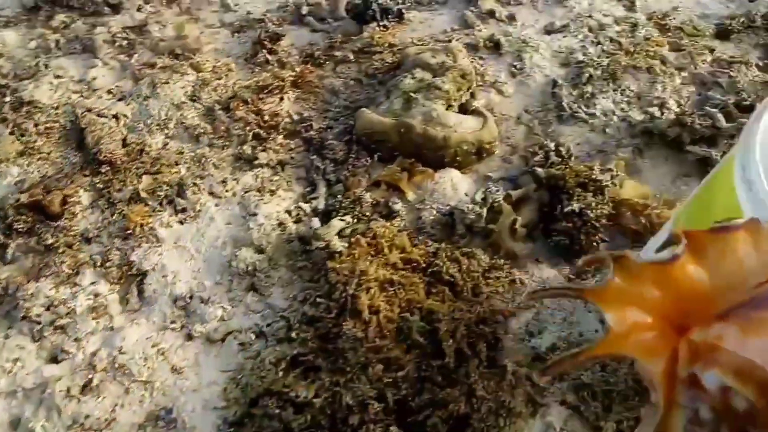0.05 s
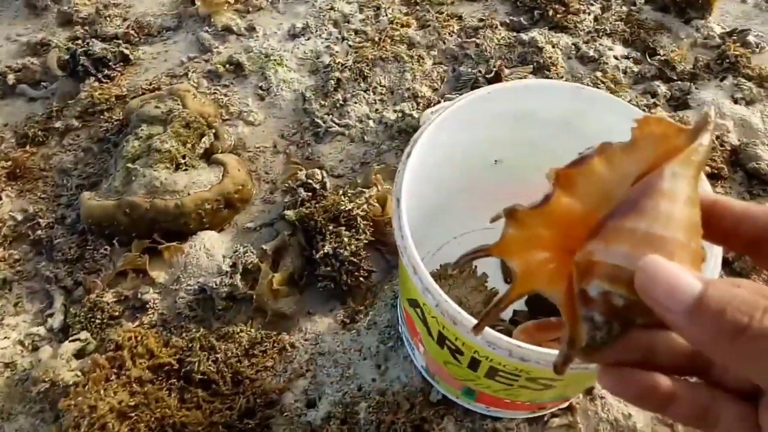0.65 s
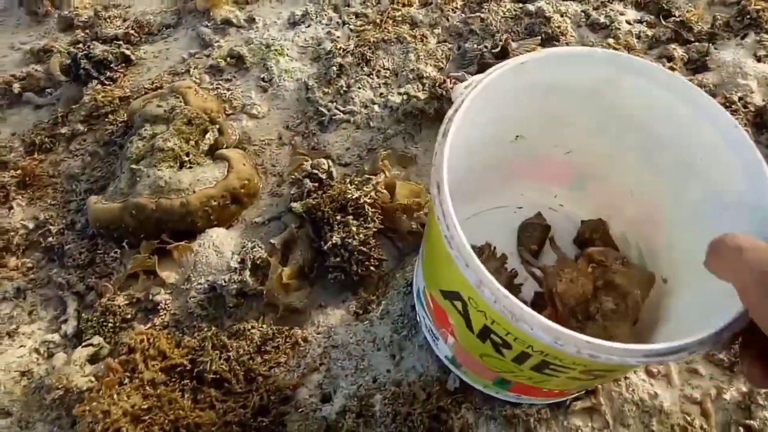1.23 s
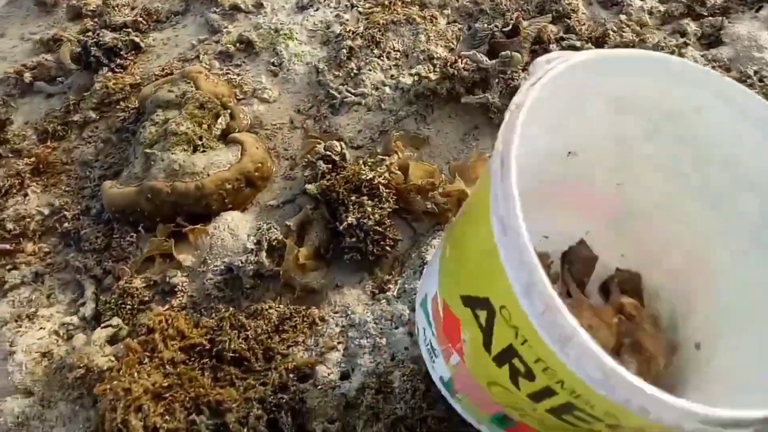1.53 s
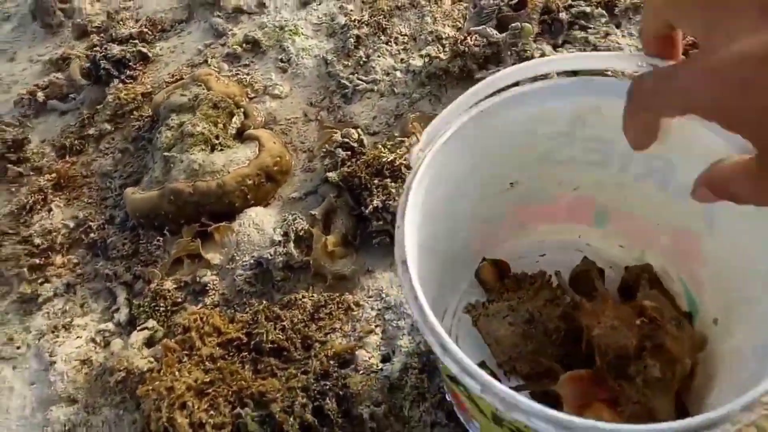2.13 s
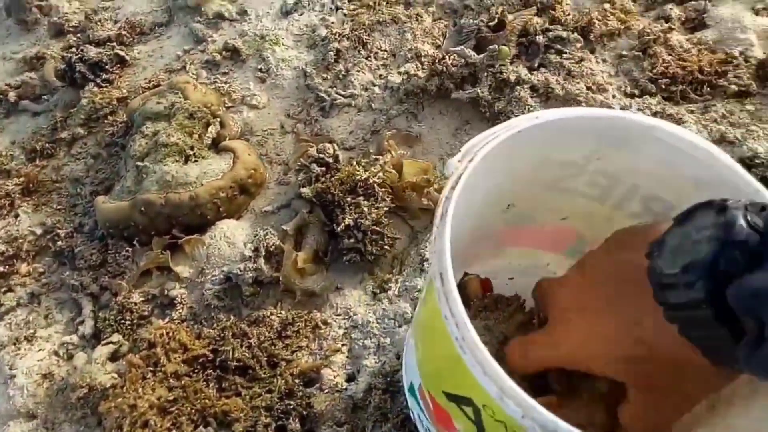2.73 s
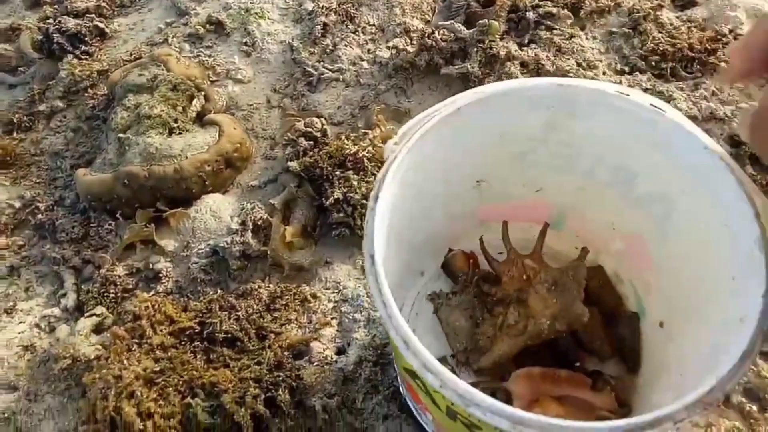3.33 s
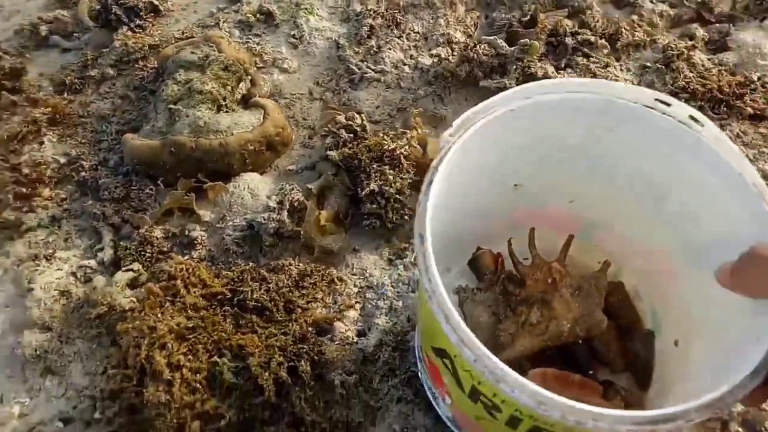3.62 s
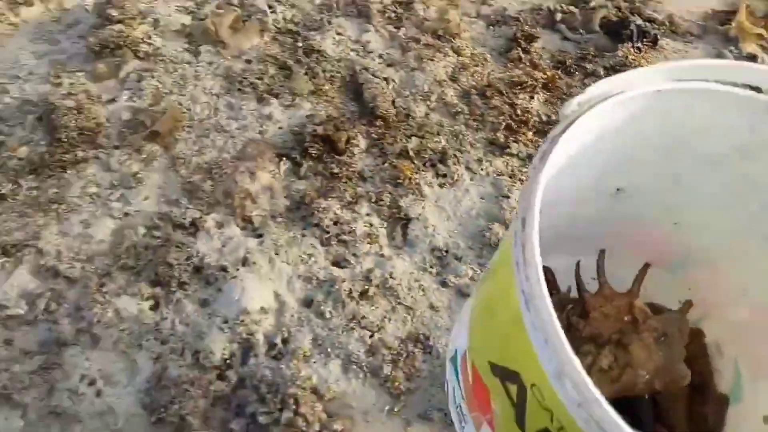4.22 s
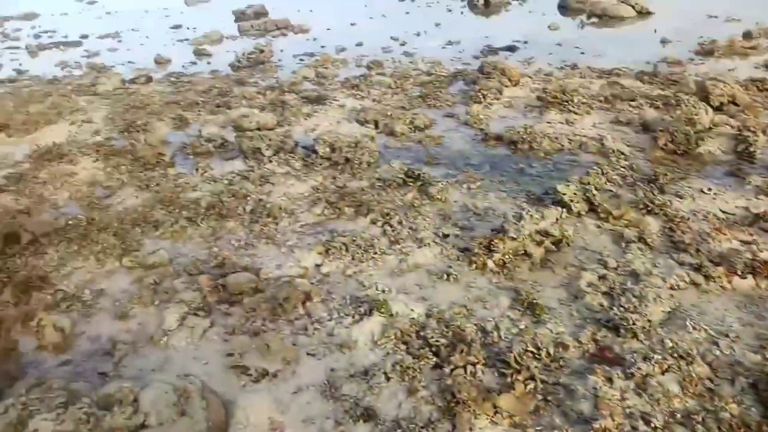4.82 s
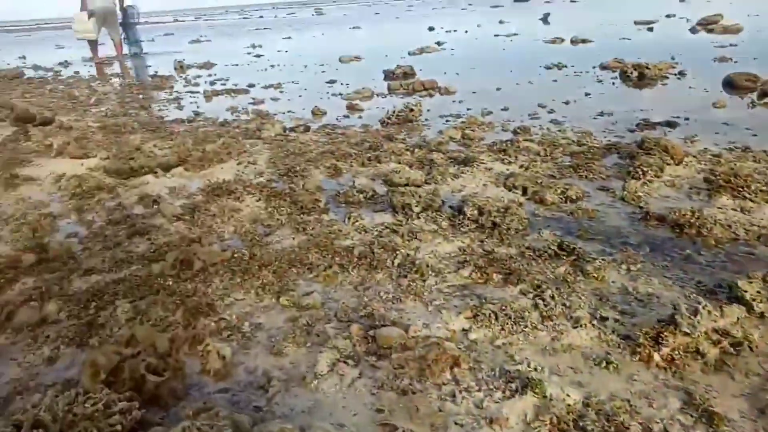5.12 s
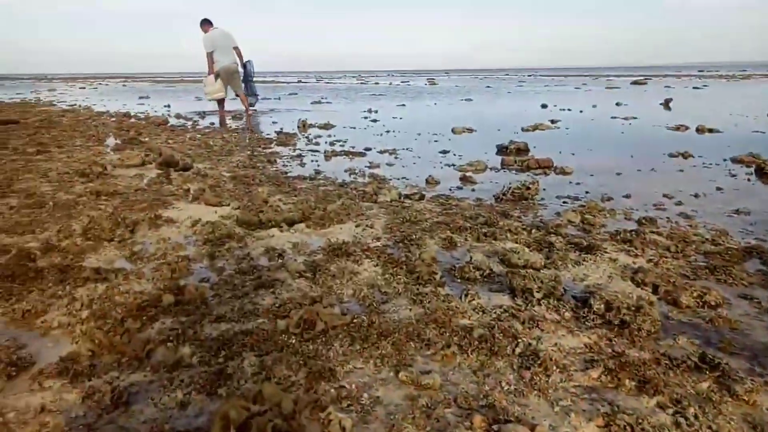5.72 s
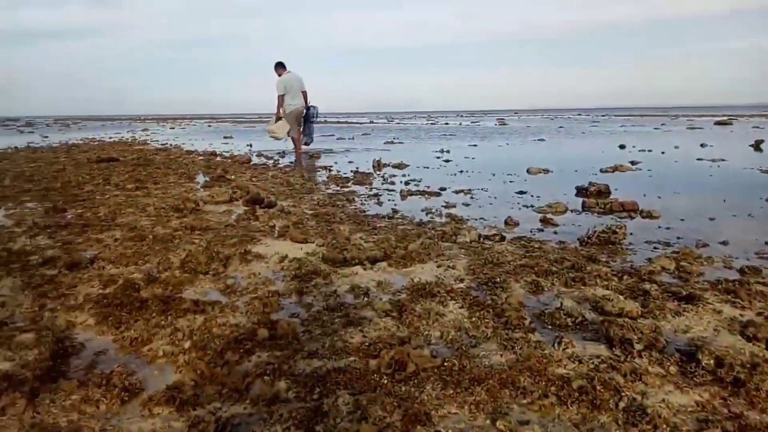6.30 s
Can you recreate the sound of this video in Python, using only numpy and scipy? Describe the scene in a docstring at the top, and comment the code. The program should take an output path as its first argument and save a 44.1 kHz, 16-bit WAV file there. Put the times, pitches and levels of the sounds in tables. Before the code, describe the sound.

Close to a hand-held microphone on a windy shore, big shells clatter into a plastic bucket, drumming on its thin floor and scraping its sides. Scattered sharp clacks follow as they are rearranged by hand. Then the shells jostle and thump in the moving bucket while a sleeve rustles. Low wind runs throughout and gusts harder near the end, with a very faint fizz from wet rubble underneath.

```python
"""Large seashells drop into a plastic bucket, are shifted by hand, then carried off over a windy reef flat.
Shell clacks on shell with a gritty crack and a short ring. The load drums on the bucket's thin floor,
and spines scrape its wall. A sleeve rustles, and tiny bubbles fizz and pop in the wet rubble.
Wind rumbles in the two ports (left and right openings) of a hand-held microphone, over a faint hiss."""
import sys
import numpy as np
from scipy import signal
from scipy.fft import rfft, irfft, next_fast_len
from scipy.io import wavfile
from scipy.ndimage import uniform_filter1d

SR = 44100
rng = np.random.default_rng(int(sys.argv[2]) if len(sys.argv) > 2 else 0)


def generate_wav(sig):
    """Save sig (samples, or channels by samples) to the path in sys.argv[1] as 16-bit PCM at SR."""
    pcm = np.round(np.clip(np.atleast_2d(sig).T, -1, 1) * 32767).astype(np.int16)
    wavfile.write(sys.argv[1], SR, pcm)


N = 289110

# Levels in the tables are relative: each layer may add its own gain and filtering.
# tone of the steady hiss: f/Hz, level/dB
AIR_TONE = [(100, 6.5), (1000, 1), (1700, 8.5), (2500, -11.5), (3300, -5.5), (5000, -2.5), (6500, -11),
            (9000, -5.5), (15000, -5.5)]
# strength and side of the wind: t/s, level/dB, left minus right/dB
WIND_STRENGTH = [(0.0, -24.5, -11), (0.3, -28, -5), (0.47, -20.5, -13.5), (0.6, -27, -4.5), (1.84, -28, 1),
                 (2.12, -21.5, -10.5), (2.22, -27, -7.5), (2.561, -20, -4.5), (3.2, -25.5, -5.5),
                 (3.839, -26, -1.5), (4.268, -29, -7), (4.841, -33, 0), (5.519, -29.5, 10), (5.75, -34, 0),
                 (6.18, -22.5, 11.5), (6.42, -34.5, 7.5), (6.501, -21, 26)]
# tone of the wind's rumble: f/Hz, level/dB
WIND_TONE = [(15, -15), (35, -18), (60, -5), (110, -0.5), (170, -4.5), (260, -10.5), (400, -21.5),
             (600, -33.5), (1000, -39.5), (2000, -63), (4000, -86)]
# gusts slap the microphone: t/s, level/dB, left minus right/dB
GUSTS = [(0.357, -12.5, -14), (0.429, -10, -11.5), (0.557, -10.5, -31), (2.134, -17, -19), (2.54, -11, 0),
         (2.629, -10.5, -31), (2.828, -10, -12), (3.025, -9.5, -26), (3.707, -12.5, 8), (5.434, -10.5, 7.5),
         (5.508, -9, 40), (5.541, -12.5, 11), (5.611, -3.5, 33), (5.744, -13, -12), (5.865, -10, 37),
         (5.954, -12.5, 27), (6.024, -12, 28.5), (6.221, -14, 18)]
# the wet rubble fizzes as it drains: t/s, level/dB
FIZZ_LEVEL = [(0.3, -56.5), (0.8, -59), (1.12, -69.5), (3.4, -59), (3.75, -64.5), (5.45, -60.5),
              (5.8, -63.5), (6.56, -63.5)]
# single bubbles burst: t/s, level/dB, f/Hz
BUBBLE_POPS = [(0.881, -40, 1820), (1.0117, -36.5, 3315), (5.576, -37.5, 3400), (5.592, -33.5, 3510),
               (5.6306, -36, 3630), (5.7185, -34, 5220), (5.792, -32, 1470), (5.8327, -30, 3380)]
# the sleeve rustles as the arm moves and the walk begins: t/s, level/dB
RUSTLE_LEVEL = [(0.3, -44), (0.65, -58), (1.0, -60), (1.13, -65.5), (2.0, -52), (2.5, -48), (2.62, -62.5),
                (2.68, -67.5), (2.95, -49.5), (3.4, -55), (3.63, -54.5), (3.76, -52.5), (3.88, -52),
                (4.06, -46.5), (4.55, -47.5), (4.9, -37.5), (5.3, -42), (5.42, -50.5), (5.49, -58),
                (5.76, -55), (5.87, -44.5), (6.13, -40.5), (6.53, -46)]
# tone of that rustle: f/Hz, level/dB
RUSTLE_TONE = [(500, -13), (1300, -9), (1750, -11), (2300, -7), (3200, -3.5), (4200, -3), (5200, -12),
               (6300, -22.5), (8000, -37), (13000, -35), (15500, -46)]
# the sleeve sweeps past as the arm reaches out: t/s, level/dB
SWISH_LEVEL = [(0.0, -30), (0.07, -37), (0.165, -26.5), (0.235, -34), (0.3, -61), (0.33, -59)]
# tone of that sweep: f/Hz, level/dB
SWISH_TONE = [(400, -11), (1000, -20.5), (1800, -11.5), (2100, -25.5), (2900, -5), (3180, -5), (3290, 7.5),
              (3420, -7.5), (3700, -13.5), (3980, 2), (4150, -5.5), (5000, -11), (5900, -13.5), (6400, -22),
              (8000, -31.5), (13000, -36.5), (15500, -42.5)]
# cloth brushes close to the right port: t/s, level/dB
BRUSH_LEVEL = [(4.55, -72.5), (4.89, -52), (5.08, -58), (5.3, -68.5), (5.4, -78.5), (5.45, -94)]
# tone of that brushing: f/Hz, level/dB
BRUSH_TONE = [(3000, 12), (6000, 13), (8000, 8.5), (10000, 3.5), (12000, 12.5), (14000, -0.5), (15500, -16)]
# how differently the two ports hear a nearby sound: f/Hz, left minus right/dB
PORT_BALANCE = [(100, 10), (300, 8.5), (750, 9), (1300, 7), (2100, 8.5), (3000, 1.5), (3700, -1.5),
                (4500, -15), (5500, -22), (7500, 2), (12000, -0.5)]
# a hand or a stride slides the load along the wall: t/s, length/s, scrape level/dB, rustle level/dB
LOAD_SLIDES = [(0.0, 0.26, -39.5, -45), (0.364, 0.012, -44.5, -54.5), (1.201, 0.019, -33.5, -38.5),
               (1.255, 0.062, -29.5, -31), (1.354, 0.27, -33.5, -46.5), (1.579, 0.066, -23, -31.5),
               (1.713, 0.07, -20.5, -41.5), (1.823, 0.042, -29, -53), (1.872, 0.084, -39, -46.5),
               (2.055, 0.018, -34.5, -45.5), (2.095, 0.0084, -30.5, -46), (2.189, 0.1, -41.5, -48.5),
               (2.23, 0.028, -29.5, -39), (2.268, 0.0085, -24, -35.5), (2.533, 0.019, -34, -39),
               (2.644, 0.11, -40, -46.5), (2.809, 0.016, -37.5, -43.5), (2.846, 0.021, -32.5, -48),
               (2.893, 0.02, -32.5, -53), (3.162, 0.11, -37, -37.5), (3.32, 0.026, -29.5, -41),
               (3.725, 0.0099, -46, -43.5), (3.779, 0.0078, -33, -38.5), (4.226, 0.018, -37, -48.5),
               (4.293, 0.0097, -34, -62.5), (4.416, 0.022, -29.5, -51), (4.472, 0.048, -33, -47.5),
               (4.576, 0.08, -32.5, -57), (4.79, 0.082, -33, -41), (4.967, 0.031, -43.5, -38.5),
               (5.063, 0.028, -37.5, -42.5), (5.24, 0.03, -42.5, -48.5), (6.154, 0.018, -33.5, -36),
               (6.264, 0.024, -39.5, -39)]
# tone of spines on plastic: f/Hz, level/dB
SCRAPE_TONE = [(150, -25), (370, 16.5), (520, 5), (750, 2.5), (1150, -1.5), (2200, -7), (3200, -9),
               (5000, -8), (7500, -21), (13000, -29), (15500, -63)]
# modes (natural ringing notes) of the bucket's wall: f/Hz, width/Hz, level/dB
WALL_MODES = [(390.8, 27, 9), (1056, 170, -0.5), (1203, 20, 9.5), (1550, 560, 4.5), (1709, 18, 1.5),
              (1889, 33, 5.5), (2362, 230, 2.5)]
# the carried load shuffles on the bucket's floor: t/s, level/dB
SHUFFLE_LEVEL = [(4.1, -41.5), (4.24, -25.5), (4.65, -28), (5.1, -35), (5.45, -61.5), (5.8, -59),
                 (5.9, -57), (6.3, -32.5), (6.56, -56.5)]
# the load or the ground bumps the bucket's floor: t/s, level/dB, f/Hz, length/s
FLOOR_THUDS = [(0.363, -17.5, 372, 0.0063), (0.432, -23, 514, 0.0093), (1.176, 0.5, 401, 0.0056),
               (1.188, -21, 386, 0.024), (1.261, -13, 352, 0.011), (1.482, -17, 392, 0.01),
               (1.586, -5.5, 394, 0.012), (1.599, -9, 369.5, 0.024), (1.624, -7, 373, 0.008),
               (1.637, -7.5, 407, 0.0096), (1.669, -9.5, 410, 0.0098), (1.683, -9, 403, .012),
               (1.698, -14, 415, 0.0074), (1.744, -13, 412, 0.0099), (1.778, -14, 378, 0.012),
               (1.806, -9.5, 390, 0.011), (1.826, -6, 390.3, 0.019), (1.866, -19.5, 407, 0.021),
               (2.631, -23, 435, 0.0081), (2.843, -12, 308, 0.011), (3.075, -10, 361, 0.012),
               (3.165, -16, 341, 0.015), (3.188, -16, 367, 0.026), (3.312, -6, 373, 0.013),
               (3.359, -17.5, 359, 0.017), (3.4, -23, 357, 0.012), (4.218, -9, 357, 0.0079),
               (4.237, -10, 366.5, 0.022), (4.289, -13.5, 339, 0.0094), (4.332, -4.5, 373, .013),
               (4.359, -9, 374, 0.0075), (4.429, -6, 384.4, 0.024), (4.502, -13, 313, 0.009),
               (4.525, -10, 403, 0.018), (4.593, -11.5, 393, 0.018), (4.612, -6.5, 343, 0.0067),
               (4.628, -12, 374, 0.013), (4.661, -10.5, 347, 0.0058), (4.687, -11, 369, 0.0091),
               (4.772, -9, 320, 0.0077), (4.79, -12, 387.4, 0.016), (4.832, -14.5, 540, 0.006),
               (4.868, -18, 357, 0.021), (4.896, -13, 331, 0.011), (4.988, -14, 354, 0.012),
               (5.01, -9, 381, 0.0088), (5.089, -13, 352, 0.013), (5.11, -15.5, 392, 0.012),
               (5.304, -15, 371, 0.015), (5.88, -18, 370, .018), (5.95, -20.5, 355, 0.02),
               (6.065, -20.5, 341, 0.02), (6.175, -15, 365, 0.014), (6.293, -19.5, 365, 0.011),
               (6.358, -16, 369, 0.015), (6.386, -16.5, 350, 0.013), (6.405, -22.5, 387, 0.02),
               (6.469, -18.5, 367, 0.014)]
# a shell lifted clear of the heap rings on: t/s, level/dB, f/Hz, time to fade by 60 dB/s
SHELL_CLINKS = [(1.557, -9.5, 1453, 0.07)]
# modes of the big spiny shell: f/Hz, width/Hz, level/dB
SHELL_MODES = [(3410, 260, -7.5), (4330, 220, -5), (5000, 140, -8)]
# shell strikes shell: t/s, level/dB, ring f/Hz, brightness/dB, how much the ring stands out/dB
SHELL_CLACKS = [(0.017, -31.5, 5050, -2, -2), (0.376, -32.5, 2080, -9.5, -4), (0.468, -47, 4900, 9, -11),
                (0.555, -46, 3070, 4, -3.5), (1.1785, -13.5, 1744, 0.5, -12),
                (1.258, -23.5, 1636, -0.5, -2), (1.276, -15.5, 4200, 11, -6), (1.293, -20, 4380, 21.5, -13),
                (1.321, -26, 4380, 20, -15), (1.395, -33.5, 3450, 16, -1), (1.401, -34.5, 4360, 18, 12),
                (1.436, -33.5, 4900, 9, 2.5), (1.457, -24, 3530, 23, -5.5), (1.47, -29.5, 3520, 7, -5.5),
                (1.487, -24.5, 4390, 0, -1.5), (1.511, -37, 3590, 9, 10.5), (1.557, -29.5, 3530, -4, -5),
                (1.589, -24.5, 3470, -10, 4), (1.61, -27, 1065, 0.5, -6.5), (1.624, -17.5, 3390, 17, -11),
                (1.629, -21.5, 3850, 7.5, -13), (1.633, -21, 1580, -14, -25),
                (1.671, -28.5, 1145, -12.5, -5), (1.689, -19.5, 1130, -5, -8),
                (1.711, -20.5, 2450, 1, -7.5), (1.72, -23.5, 1224, -3.5, 4.5),
                (1.729, -17.5, 1724, 5.5, -4), (1.739, -23.5, 3460, 5.5, -7.5),
                (1.76, -24, 1320, -16.5, -12.5), (1.784, -18.5, 2335, -1, -14), (1.796, -16, 3358, 40.5, 3),
                (1.82, -28, 3540, -15, 7), (1.833, -25, 1056, -21.5, -10.5), (1.855, -29, 1290, -9, -10.5),
                (1.905, -35, 2256, 2, -12.5), (2.039, -36, 1756, 0, 1), (2.059, -34, 3590, 7.5, -13),
                (2.105, -28, 990, -2, -7.5), (2.12, -35.5, 1516, 1.5, 0.5), (2.23, -28, 1650, -5, -5),
                (2.27, -21.5, 1545, -11.5, -17.5), (2.28, -26.5, 1703, 11, 9),
                (2.344, -33.5, 2080, -4.5, -8), (2.366, -30.5, 1555, -15.5, 3),
                (2.403, -28.5, 1754, -12.5, 5), (2.462, -36.5, 1075, -7, -12.5), (2.686, -30, 1760, -8, -1),
                (2.848, -33.5, 1057, -24.5, -25), (2.86, -27.5, 1032, -16.5, -13),
                (2.923, -19, 3637, 8, -1), (3.076, -23.5, 1102, -2.5, 22), (3.163, -18, 2310, 11, 4),
                (3.18, -33, 2050, -13, 7), (3.19, -22.5, 1105, -5, -8.5), (3.3126, -17, 942, -4.5, -0.5),
                (3.325, -25.5, 4540, 28, -14.5), (3.334, -24, 1074, -3.5, -3),
                (3.364, -38, 1005, -9.5, 4.5), (3.384, -30.5, 1427, -0.5, 0.5),
                (3.456, -44.5, 1590, 3.5, -1), (3.562, -35, 5090, 13, -1), (3.789, -32.5, 1946, -2.5, -4.5),
                (4.202, -27, 2850, 4, -6), (4.23, -30, 867, -1.5, 2.5), (4.264, -37, 1200, -2, -11),
                (4.336, -26, 1124, -6, 5.5), (4.357, -36, 1420, -7.5, 2), (4.434, -22, 1517, 0, -0.5),
                (4.492, -29.5, 1420, -6, -3), (4.587, -38, 1510, -6, -2.5), (4.61, -33.5, 2095, -2.5, -5),
                (4.656, -32.5, 1140, -11, -12), (4.675, -35.5, 2300, -3.5, -9.5),
                (4.698, -29, 1227, -10, -4), (4.717, -32.5, 2860, -8, -4), (4.77, -36.5, 1130, -6.5, -7.5),
                (4.801, -37.5, 1210, -13, -18), (4.814, -34.5, 3150, -5.5, 0), (4.828, -32.5, 2070, 8.5, 5),
                (4.889, -27.5, 3580, -1.5, 3.5), (4.902, -33, 3050, -3, 0), (4.914, -34, 2510, 1.5, -3),
                (4.976, -34, 1263, -11.5, -0.5), (5.012, -34.5, 1150, -8.5, -7.5),
                (5.076, -33, 803, -12.5, -2), (5.093, -30.5, 1110, -13, -21), (5.101, -34.5, 2930, -4, 8.5),
                (5.113, -39.5, 1745, 5, -4), (5.253, -42.5, 2200, -7.5, -7), (5.3, -36, 2945, -4, -2.5),
                (5.986, -40.5, 3690, 14, -12.5), (6.171, -32, 2705, 1, -6.5), (6.294, -37, 3400, 9, -4),
                (6.371, -32.5, 2660, -1, -9.5), (6.383, -34, 2950, 0, -7)]
# basic tone of the clacks, also used for the pops: f/Hz, level/dB
CLACK_TONE = [(100, -25.5), (260, 3), (390, 4.5), (520, -3), (750, -5.5), (1100, -5.5), (3000, -0.5),
              (4600, -2), (5500, -11.5), (6500, -17.5), (8000, -32.5), (12500, -26), (15000, -47.5)]
# borders of a clack's low, middle and high band: f/Hz
BAND_EDGES = [600, 1600, 3200, 6000]
# centres of those three bands: f/Hz
BAND_CENTRES = [980, 2260, 4380]


def amp(db):
    """Turns decibels into a gain to multiply by."""
    return 10 ** (np.asarray(db) / 20)


def unit(x):
    """Scales a signal to an average power of 1."""
    return x / np.sqrt(np.mean(x ** 2) + 1e-20)


def level(rows):
    """Turns (time, dB) points into a gain for every sample, fading fast outside their span."""
    times, db = np.transpose(rows)
    t = np.arange(N) / SR
    outside_s = abs(t - np.clip(t, times[0], times[-1]))
    return amp(np.interp(t, times, db) - 200 * outside_s)


def add(mix, start_s, sound):
    """Adds a two-channel sound to the mix at the given time."""
    part = mix[:, max(round(start_s * SR), 0):][:, :sound.shape[1]]
    part += sound[:, :part.shape[1]]


def colour(x, tone, size=2048):
    """Gives x a tone drawn as (Hz, dB) points; the filter never sounds ahead of x (minimum phase)."""
    hz, db = np.transpose(tone)
    curve_db = np.interp(np.log(np.fft.rfftfreq(size, 1 / SR) + 1), np.log(hz + 1), db)
    cepstrum = irfft(np.log(amp(curve_db)))
    cepstrum[1:size // 2] *= 2
    cepstrum[size // 2 + 1:] = 0
    response = irfft(np.exp(rfft(cepstrum)))
    return signal.fftconvolve(x, response[None], axes=1)[:, :x.shape[1]]


def stereo_noise(length, alike):
    """Left and right noise, from unrelated (alike=0) to identical (alike=1)."""
    left, other = rng.standard_normal((2, length))
    return np.array([left, alike * left + np.sqrt(1 - alike ** 2) * other])


def wobble(rate_hz):
    """A random curve that heads for a new value rate_hz times a second."""
    knots = rng.standard_normal(N // 16)
    return unit(np.interp(np.arange(N) / SR * rate_hz, np.arange(len(knots)), knots))


def sides(pan_db):
    """Left and right gains with the same total power; positive pan_db leans left."""
    ratio = np.atleast_1d(amp(pan_db))
    return np.array([ratio, np.ones_like(ratio)]) / np.sqrt((1 + ratio ** 2) / 2)


def ports(x, lean_db=0):
    """Shares a sound between the left and right port, band by band."""
    hz, pan_db = np.transpose(PORT_BALANCE)
    gains_db = 20 * np.log10(sides(pan_db + lean_db))
    return np.vstack([colour(x[[side]], np.c_[hz, db]) for side, db in enumerate(gains_db)])


def delay_right(x, lag_s=0.00014):
    """Sound from the bucket reaches the right port a little later."""
    size = next_fast_len(N + 512)
    delay = np.exp(-2j * np.pi * np.fft.rfftfreq(size, 1 / SR) * lag_s)
    return np.array([x[0], irfft(rfft(x[1], size) * delay, size)[:N]])


def ringing(x, modes):
    """A body shaken by x rings at its own notes."""
    return sum(amp(db) * signal.lfilter(*signal.iirpeak(hz, hz / width, fs=SR), x)
               for hz, width, db in modes)


def air(hiss_db=-65):
    """The open reef flat gives a faint, steady hiss."""
    return amp(hiss_db) * unit(colour(rng.standard_normal((2, N)), AIR_TONE))


def wind(lump_db=3.5):
    """Swirling air rumbles unevenly in each port, louder in the one facing the wind."""
    times, db, pan_db = np.transpose(WIND_STRENGTH)
    t = np.arange(N) / SR
    swirls = rng.standard_normal((2, N)) * amp(lump_db * np.array([wobble(25), wobble(25)]))
    rumble = unit(colour(swirls, WIND_TONE))
    return amp(np.interp(t, times, db)) * rumble * sides(np.interp(t, times, pan_db))


def gusts(width_s=0.002, swing_hz=115, pitch_spread=0.14, gain_db=-1.5):
    """Single swirls of air, each of its own size, slap the ports, mostly one harder than the other."""
    t, out = np.arange(SR // 20) / SR, np.zeros((2, N))
    for start_s, db, pan_db in GUSTS:
        hz = swing_hz * np.exp(pitch_spread * rng.standard_normal())
        swing = np.sin(2 * np.pi * (hz * t + rng.random((2, 1))))
        push = (t / width_s) ** 2 * np.exp(-t / width_s) * swing
        add(out, start_s, amp(db + gain_db) * sides(pan_db) * push / abs(push).max())
    return out


def rubble_fizz(bubbles_per_s=2000, spread_db=3, cycles=6, drift_db=5, low_hz=3400, high_hz=5900, sizes=14):
    """Tiny bubbles burst all over the wet rubble, middle sizes loudest; each size comes and goes."""
    t, out = np.arange(SR // 50) / SR, np.zeros((2, N))
    for hz, share in zip(np.geomspace(low_hz, high_hz, sizes), np.sqrt(np.hamming(sizes))):
        bursts = rng.random((2, N)) < bubbles_per_s / sizes / SR
        strength = amp(spread_db * np.minimum(rng.exponential(1, N), 2))
        ping = share * np.sin(2 * np.pi * hz * t) * np.sqrt(t) * np.exp(-hz * t / cycles)
        pings = signal.oaconvolve(bursts * strength, ping[None], axes=1)[:, :N]
        out += pings * amp(drift_db * wobble(13))
    return level(FIZZ_LEVEL) * unit(out)


def bubble_pops(rise_s=0.00018, decay_s=0.0019, spray_share=0.48, gain_db=2):
    """A bubble bursts in the wet rubble: a short ping with a little spray."""
    t, out = np.arange(SR // 25) / SR, np.zeros((2, N))
    shape = (1 - np.exp(-t / rise_s)) * np.exp(-t / decay_s)
    for start_s, db, hz in BUBBLE_POPS:
        spray = spray_share * rng.standard_normal((2, len(t)))
        add(out, start_s, amp(db + gain_db) * shape * (np.sin(2 * np.pi * hz * t) + spray))
    return colour(out, CLACK_TONE)


def sliding(column, rise_s=0.0038, sag_db_per_s=8.5, stop_db_per_s=319.5,
            settle_db=-23.5, settle_db_per_s=112.5):
    """Gain of the slides: each starts fast, weakens a little and stops; then a few pieces settle."""
    t, power = np.arange(N) / SR, np.zeros(N)
    for slide in LOAD_SLIDES:
        start_s, length_s, db = slide[0], slide[1], slide[column]
        since_start = np.maximum(t - start_s + rise_s / 2, 0)
        since_end = np.maximum(t - start_s - length_s, 0)
        push = np.minimum(since_start / rise_s, 1) * amp(db - sag_db_per_s * since_start)
        release = amp(-stop_db_per_s * since_end) + amp(settle_db - settle_db_per_s * since_end)
        power += (push * release) ** 2
    return np.sqrt(power) / (1 + amp(settle_db))


def sleeve(grain_db=1, flutter_db=2.5, brush_db=3):
    """Cloth fibres rub together, mostly on the right; the closest strokes add a fine fizz."""
    rasp = stereo_noise(N, alike=0.12) * amp(grain_db * wobble(700) + flutter_db * wobble(50))
    movement = np.hypot(level(RUSTLE_LEVEL), sliding(column=3))
    rustle = movement * unit(ports(colour(rasp, RUSTLE_TONE), lean_db=-11.5))
    swish = level(SWISH_LEVEL) * unit(ports(colour(rasp, SWISH_TONE), lean_db=-10))
    brush = amp(brush_db) * level(BRUSH_LEVEL) * unit(colour(rasp, BRUSH_TONE)) * sides(pan_db=-22.5)
    return rustle + swish + brush


def bucket_wall(x):
    """The plastic wall adds its own ringing to a sound."""
    return x + ringing(x, WALL_MODES)


def rubbing(skid_db=-17.5, skid_s=0.033, grate_db=-7):
    """How hard shells rub the wall: slides, a skid after each clack, faint grating as the arm moves."""
    kicks = np.zeros(N)
    for start_s, db, *_ in SHELL_CLACKS:
        kicks[round(start_s * SR)] += amp(db + skid_db) ** 2
    skid_power = signal.lfilter([1], [1, -np.exp(-2 / (skid_s * SR))], kicks) + 1e-14
    grating = amp(grate_db) * level(RUSTLE_LEVEL)
    return np.sqrt(sliding(column=2) ** 2 + skid_power + grating ** 2)


def spine_scrape(slips_per_s=1000, spread_db=4, cycles=3.9, grind_db=-5, judder_db=6.5, pitches=24):
    """Spines stick and slip on the plastic: small ticks of many pitches over a shaky grinding noise."""
    t, ticks = np.arange(SR // 50) / SR, np.zeros((2, N))
    for hz in np.geomspace(480, 5200, pitches):
        slips = rng.random(N) < slips_per_s / pitches / SR
        strength = amp(spread_db * np.minimum(rng.exponential(1, N), 3))
        tick = np.sin(2 * np.pi * hz * t + rng.normal(0, 1, (2, 1))) * np.exp(-hz * t / cycles) * hz
        ticks += signal.oaconvolve((slips * strength)[None], tick, axes=1)[:, :N]
    grind = stereo_noise(N, alike=1) * amp(judder_db * wobble(90))
    friction = unit(ticks) + amp(grind_db) * unit(grind)
    return rubbing() * unit(colour(bucket_wall(friction), SCRAPE_TONE))


def load_shuffle(floor_hz=372, width_hz=110, lurch_db=3):
    """Countless small bumps keep the bucket's floor rumbling at its own pitch."""
    mode = signal.iirpeak(floor_hz, floor_hz / width_hz, fs=SR)
    bumps = rng.standard_normal(N) * amp(lurch_db * wobble(50))
    return level(SHUFFLE_LEVEL) * unit(signal.lfilter(*mode, signal.lfilter(*mode, bumps)))


def floor_thuds(rise_share=0.22, tail_db=-19, tail_s=0.02, bend=0.036,
                buzz_db=-12, buzz_hz=440, knock_db=-17, knock_s=0.0011):
    """The thin floor drums and buzzes under the load, its pitch sagging; the wall adds a hollow knock."""
    t, out = np.arange(SR // 8) / SR, np.zeros((2, N))
    knock_band = signal.butter(2, [450, 1500], "bandpass", fs=SR)
    buzz_band = signal.butter(2, [buzz_hz / 1.86, buzz_hz * 1.126], "bandpass", fs=SR)
    for start_s, db, hz, length_s in FLOOR_THUDS:
        noise, tap = rng.standard_normal((2, len(t)))
        attack = 1 - np.exp(-(t / (rise_share * length_s)) ** 2)
        shape = attack * (np.exp(-(t / length_s) ** 2) + amp(tail_db) * np.exp(-t / tail_s))
        turns = np.cumsum(hz * (1 + bend * (np.exp(-t / length_s) - .5))) / SR
        buzz = amp(buzz_db) * unit(signal.lfilter(*buzz_band, noise))
        drum = shape * (np.sin(2 * np.pi * turns) + buzz)
        knock = bucket_wall(signal.lfilter(*knock_band, tap * attack * np.exp(-t / knock_s)))
        thud = drum / abs(drum).max() + amp(knock_db) * knock / abs(knock).max()
        add(out, start_s, amp(db) * np.tile(thud, (2, 1)))
    return out


def shell_clinks(rise_s=0.00073):
    """A shell that is free of the heap rings with one clear note."""
    t, out = np.arange(SR // 5) / SR, np.zeros((2, N))
    for start_s, db, hz, fade_s in SHELL_CLINKS:
        shape = amp(db - 60 * t / fade_s) * (1 - np.exp(-t / rise_s))
        add(out, start_s, np.tile(shape * np.sin(2 * np.pi * hz * t), (2, 1)))
    return out


def shell_ring(t, hz, side_db=-9, middle_fade_s=0.02, middle_hz=1500, damping=0.47):
    """A struck shell rings at one main note and two weaker neighbours; higher rings die sooner."""
    modes = hz * np.array([1, rng.uniform(1.0, 1.5), rng.uniform(0.738, 1.0)])
    skews = rng.standard_normal(3) * modes / 3500  # high notes reach the two ports out of step
    ring = sum(amp(db) * np.sin(2 * np.pi * mode * t + np.array([[0], [skew]]))
               for mode, db, skew in zip(modes, (0, side_db, side_db), skews))
    fade_s = middle_fade_s * (middle_hz / hz) ** damping
    return ring * amp(-60 * t / fade_s)


def chatter(hit, span_s=0.0068, touch_db=-10, touches=3):
    """A knobbly shell touches a few more times just after the first contact."""
    out = hit.copy()
    for delay, strength in rng.random((touches, 2)):
        add(out, span_s * delay, amp(touch_db) * 2 * (strength - .5) * hit)
    return out


def band_shares(ring_hz, bright_db, stand_out_db, focus_db=11, focus_octaves=0.51):
    """A clack's energy per band in dB: harder contact is brighter, and energy gathers near the ring."""
    nearness = np.exp(-(np.log2(np.array(BAND_CENTRES) / ring_hz) / focus_octaves) ** 2)
    db = bright_db * np.array([-.5, 0, .5]) + (focus_db + stand_out_db) * nearness
    return db - 10 * np.log10(np.sum(amp(db) ** 2))


def balance_bands(hit, want_db, steps=3):
    """Moves a hit's three bands toward the wanted levels: one broad step, then finer ones."""
    size = hit.shape[1]
    hz = np.fft.rfftfreq(size, 1 / SR)
    bands = [(hz > low) & (hz < high) for low, high in zip(BAND_EDGES, BAND_EDGES[1:])]
    for step in range(steps):
        power = (abs(rfft(hit)) ** 2).mean(0)
        have_db = 10 * np.log10([power[band].sum() * 8 / size ** 2 for band in bands])
        tone = list(zip(BAND_CENTRES, want_db - have_db))
        hit = colour(hit, [(BAND_EDGES[0], 0), *tone, (BAND_EDGES[-1], 0)] if step else tone)
    return hit


def shell_clacks(crack_s=0.0024, rise_s=0.0013, echo_db=-22, echo_s=0.017,
                 shell_db=-1, ring_db=-2, lead_s=0.0006):
    """Shell hits shell: a gritty crack and a short ring, with a brief echo inside the bucket."""
    t, out = np.arange(4096) / SR, np.zeros((2, N))
    attack = 1 - np.exp(-(t / rise_s) ** 2)
    decay = np.exp(-t / crack_s) + amp(echo_db) * np.exp(-t / echo_s)
    for start_s, db, hz, bright_db, stand_out_db in SHELL_CLACKS:
        contact = stereo_noise(len(t), alike=0.63) * attack * decay
        crack = unit(bucket_wall(contact) + amp(shell_db) * ringing(contact, SHELL_MODES))
        ring = amp(ring_db + stand_out_db / 2) * unit(attack * shell_ring(t, hz))
        hit = colour(chatter(crack + ring), CLACK_TONE)
        hit = balance_bands(hit, band_shares(hz, bright_db, stand_out_db))
        add(out, start_s - lead_s, amp(db) * hit)
    return out


def scene():
    """The bucket of shells and the sleeve, close by, on the wet and windy reef."""
    bucket = shell_clacks() + shell_clinks() + floor_thuds() + load_shuffle() + spine_scrape()
    nearby = delay_right(ports(bucket + bubble_pops()))
    return nearby + sleeve() + wind() + gusts() + rubble_fizz() + air()


def suppress_hiss(x, margin_db=5, depth_db=-9, above_hz=700, size=1024):
    """A noise suppressor turns down each upper band whenever it nears its own quiet level."""
    frames = dict(fs=SR, nperseg=size, noverlap=size * 3 // 4)
    hz, _, spectrum = signal.stft(x, **frames)
    power = uniform_filter1d(abs(spectrum) ** 2, size=7, axis=1)  # smooth over pitch
    power = abs(uniform_filter1d(power, size=5, axis=2)) + 1e-18  # then over time
    quiet = np.percentile(power, 20, axis=2, keepdims=True) * amp(margin_db) ** 2
    cut_db = depth_db * quiet ** 2 / (quiet ** 2 + power ** 2) * (hz > above_hz)[:, None]
    return signal.istft(spectrum * amp(cut_db), **frames)[1][:, :N]


def record(dry, top_hz=15400):
    """Faint hiss is turned down, the hardest hits overload, and the highest treble is cut off."""
    overloaded = np.clip(suppress_hiss(dry), -1, 1)
    low_pass = signal.firwin(401, top_hz, window=("kaiser", 9), fs=SR)
    return signal.oaconvolve(overloaded, low_pass[None], "same", axes=1)


dry = scene()
out = record(dry)
generate_wav(out)
```